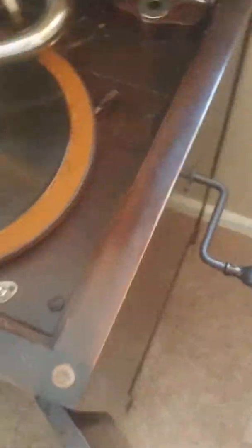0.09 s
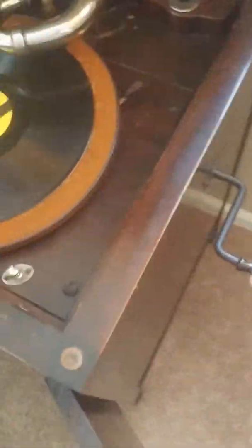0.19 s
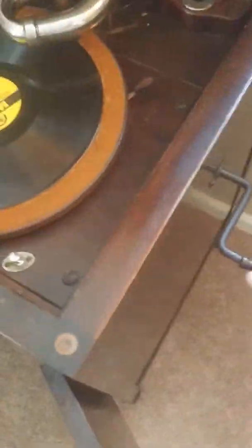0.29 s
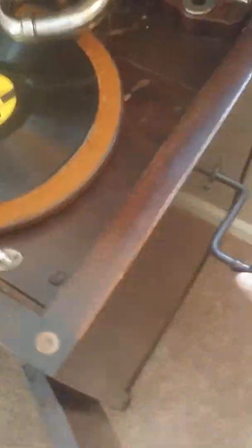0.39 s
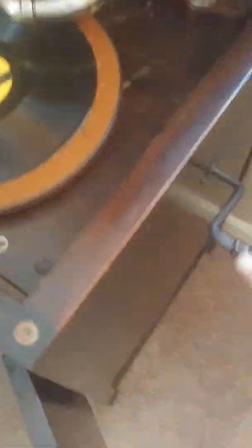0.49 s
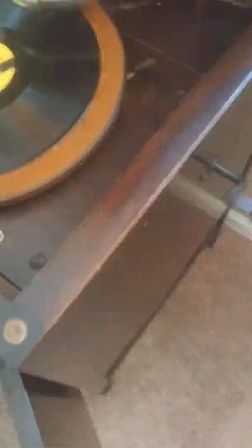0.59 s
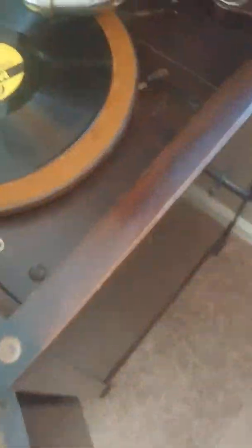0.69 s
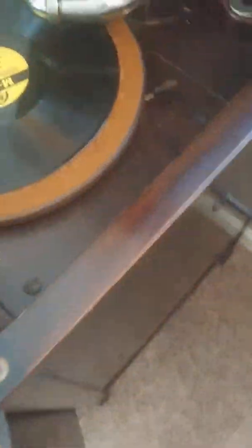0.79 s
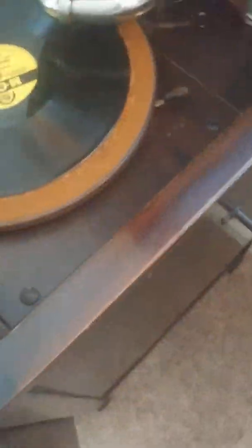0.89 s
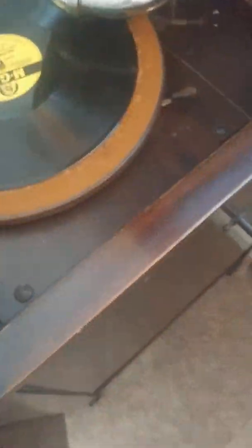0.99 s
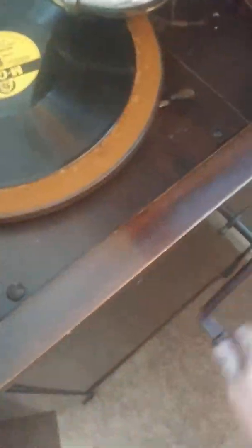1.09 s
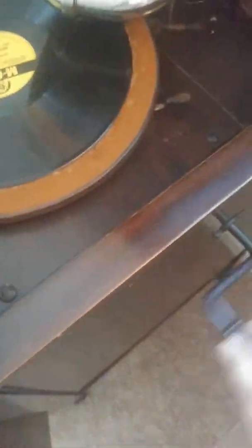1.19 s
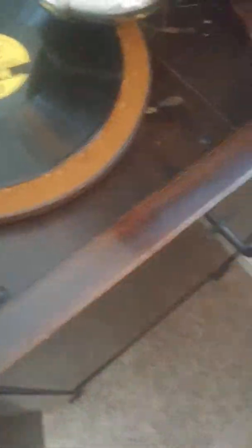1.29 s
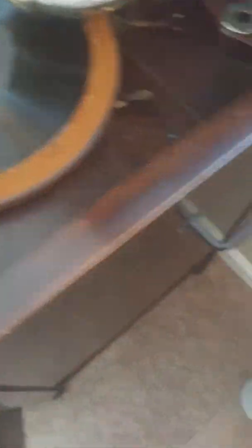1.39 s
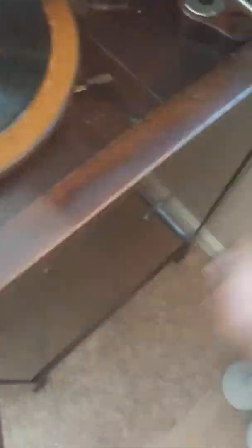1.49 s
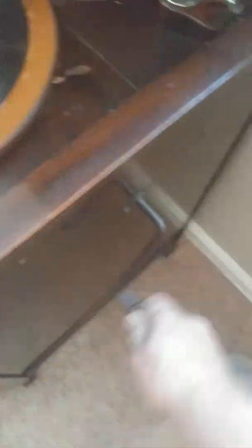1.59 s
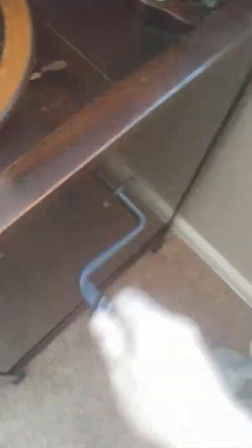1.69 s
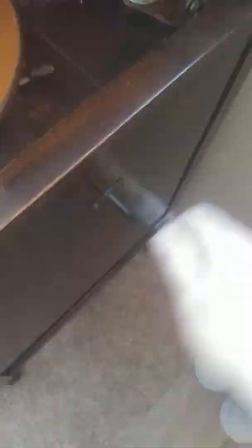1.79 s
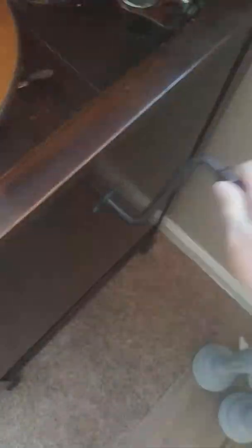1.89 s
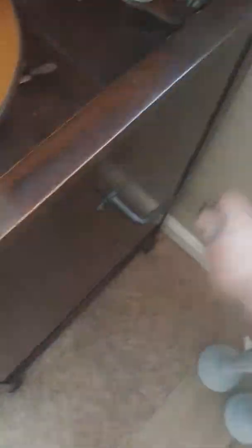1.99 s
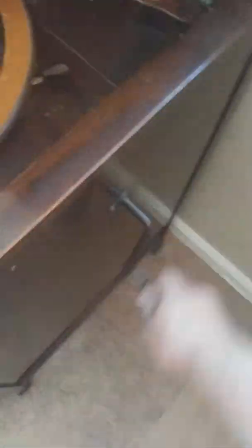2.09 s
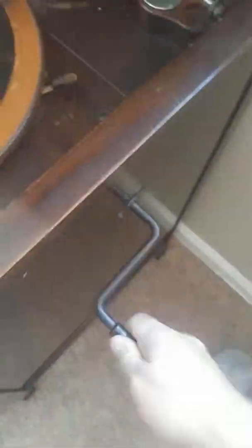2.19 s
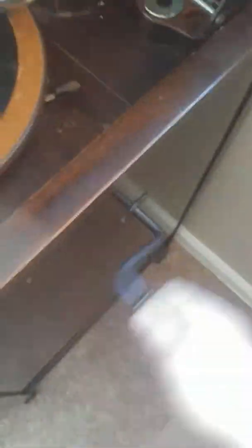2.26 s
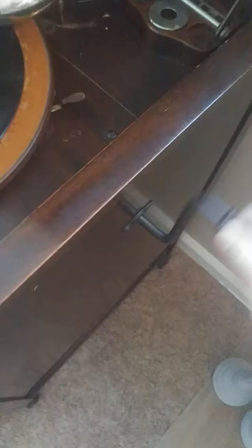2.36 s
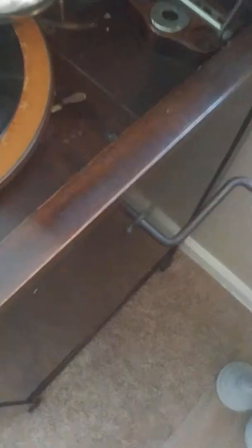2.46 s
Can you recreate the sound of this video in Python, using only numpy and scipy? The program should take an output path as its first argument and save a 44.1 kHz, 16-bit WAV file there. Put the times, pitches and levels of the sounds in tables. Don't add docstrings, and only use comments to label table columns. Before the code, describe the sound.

Hand crank winding a spring motor in a wooden cabinet, gears grinding after sharp metallic knocks

```python
import sys
import numpy as np
from scipy import signal
from scipy.fft import rfft, irfft, next_fast_len
from scipy.io import wavfile
from scipy.ndimage import uniform_filter1d

SR = 44100
rng = np.random.default_rng(int(sys.argv[2]) if len(sys.argv) > 2 else 0)


def wrap_up_sound(samples):
    columns = np.atleast_2d(samples).T
    tamed = np.clip(columns, -1, 1)
    steps = np.round(tamed * 32767).astype(np.int16)
    wavfile.write(sys.argv[1], SR, steps)


def field_ratio(decibels):
    return 10 ** (np.asarray(decibels, dtype=float) / 20)


N = 110250


def evened(x):
    return x / np.sqrt(np.mean(x ** 2) + 1e-20)


def peak_of(x, db):
    return field_ratio(db) * x / np.abs(x).max()


def read(points, hz):
    f, value = np.transpose(points)
    return np.interp(np.log(hz + 1), np.log(f + 1), value)


def curve(table):
    start_s, level_db = np.transpose(table)
    return np.interp(np.arange(N) / SR, start_s, level_db)


def add(mix, s, sound):
    part = mix[..., max(round(s * SR), 0):][..., :sound.shape[-1]]
    part += sound[..., :part.shape[-1]]


def filtered(x, order, hz, kind="low"):
    return signal.sosfilt(signal.butter(order, hz, kind, fs=SR, output="sos"), x)


def resonate(x, hz, width):
    r = np.exp(-np.pi * width / SR)
    turn = np.exp(2j * np.pi * hz / SR)
    return 2 * signal.lfilter([1 - r], [1, -r * turn], x).real


def strike(drive, body):
    return signal.oaconvolve(drive[None], body, axes=1)


def turns_of(count, per_s):
    return np.cos(np.pi * (per_s * np.arange(N) / SR + np.arange(count)[:, None] / count))


# pitch_hz, level_db (per Hz)
AIR = [(30, -5.5), (60, 2.5), (120, -2), (200, -31.5), (500, -10.5), (1500, -26), (5000, -32), (16000, -26)]
# pitch_hz, likeness (1 = same at both ports)
AIR_SAME = [(60, 1), (200, 0.99), (500, 0.53), (1500, 0.038), (8000, 0.065)]
AIR_DB = -58
WHINE_HZ, WHINE_WIDTH_HZ, WHINE_DB = 12500, 100, -76
HISS_PATCH_DB, HISS_SWELL_DB, WHINE_WAVER_DB = 1.5, 1.5, 4


def air():
    frames, hz = N // 256 + 5, np.fft.rfftfreq(1024, 1 / SR)
    a, b, c, d, patches = rng.standard_normal((frames, 513, 5)).T
    patches = uniform_filter1d(uniform_filter1d(patches, size=12, axis=0), size=14, axis=1)
    swell = evened(uniform_filter1d(rng.standard_normal(frames), size=20))
    level_db = read(AIR, hz)[:, None] + HISS_PATCH_DB * evened(patches) + HISS_SWELL_DB * swell
    same = np.clip(read(AIR_SAME, hz), -1, 1)[:, None]
    left = a + 1j * b
    right = same * left + np.sqrt(1 - same ** 2) * (c + 1j * d)
    hiss = signal.istft(np.array([left, right]) * field_ratio(level_db), nperseg=1024, noverlap=768)[1][:, :N]

    whine = evened(resonate(rng.standard_normal(N), WHINE_HZ, WHINE_WIDTH_HZ))
    waver = evened(uniform_filter1d(rng.standard_normal(N), size=3000))
    whine_db = np.array([[WHINE_DB], [WHINE_DB - 19]]) + WHINE_WAVER_DB * waver
    return field_ratio(AIR_DB) * evened(hiss) + whine * field_ratio(whine_db)


# start_s, level_db
ROCK = [(0, -54), (.27, -51), (.3, -39), (.46, -61.5), (1.11, -46), (1.16, -42.5), (1.22, -49), (1.28, -39),
        (1.38, -48), (1.48, -46), (1.63, -68), (1.72, -41), (1.76, -44.5), (1.84, -34.5), (2.08, -64),
        (2.24, -38.5), (2.33, -42), (2.5, -47.5)]
ROCK_HZ, ROCK_WIDTH_HZ = 72, 6


def rocking():
    hum = resonate(resonate(rng.standard_normal(N), ROCK_HZ, ROCK_WIDTH_HZ), ROCK_HZ, 22)
    steady = hum / np.sqrt(uniform_filter1d(hum ** 2, size=2400) + 0.36 * np.mean(hum ** 2))
    return field_ratio(curve(ROCK) - 4.5) * steady


# start_s, level_db (peak), pitch_hz (centre), t60_s
TICKS = [(0.009, -38, 6600, 0.03), (0.0094, -29.5, 2840, 0.06), (0.188, -49, 2420, 0.34),
         (0.2043, -24.5, 3070, 0.07), (0.2054, -26.5, 10400, 0.034), (0.2513, -34, 6370, 0.033),
         (0.2682, -29.5, 8060, 0.14), (0.2732, -12, 10770, 0.086), (0.2884, -38, 11000, 0.068),
         (0.576, -55, 6900, 0.041), (0.589, -41.5, 10500, 0.02), (0.6085, -50, 10200, 0.023),
         (0.709, -57, 3260, 0.19), (0.9057, -57, 3230, 0.074), (0.9632, -39, 2960, 0.037),
         (0.9728, -39.5, 2450, .09), (1.1309, -74, 2360, .04), (1.235, -66, 2430, .04),
         (1.242, -49.5, 3100, 0.043), (1.2885, -57, 2400, 0.044), (1.3754, -52.5, 2640, 0.037),
         (1.413, -53, 2900, 0.093), (1.445, -52.5, 2590, 0.21), (1.484, -56, 2570, .05),
         (1.502, -51, 2300, 0.14), (1.5485, -35, 2240, 0.079), (1.8701, -41.5, 10600, 0.014),
         (1.889, -52, 10500, 0.067), (2.0412, -49.5, 2860, 0.22), (2.073, -52, 2470, 0.13),
         (2.0846, -43, 2960, 0.12), (2.262, -65, 2190, .04), (2.2934, -46, 4300, 0.018),
         (2.3242, -52, 2080, 0.087), (2.375, -52, 4230, 0.027), (2.4944, -45.5, 3750, 0.022)]
TICK_DB, TICK_FLAT_DB = -11, -6.5
TICK_WIDE, TICK_WIDEST_HZ, TICK_REACH = 0.58, 2600, 3
TICK_SNAP_DB, TICK_SNAP_S = -7, 0.016


def ticks():
    out, t = np.zeros(N), np.arange(6000) / SR
    for (s, db, hz, t60), (chance, lumps) in zip(TICKS, rng.standard_normal((len(TICKS), 2, 6000))):
        grains = chance * field_ratio(2.15 * evened(uniform_filter1d(lumps, size=70)))
        width = min(TICK_WIDE * hz, TICK_WIDEST_HZ)
        tone = evened(resonate(resonate(grains, hz, width), hz, 2 * width))
        flat = evened(filtered(grains, 2, min(TICK_REACH * hz, SR / 2.2)))
        burst = evened(filtered(tone + field_ratio(TICK_FLAT_DB) * flat, 2, 900, "high"))
        dying = field_ratio(db + TICK_DB - 60 * t / max(t60, .005))
        onset = np.minimum(t / 0.0009, 1)
        snap = 1 + field_ratio(TICK_SNAP_DB) * np.exp(-t / TICK_SNAP_S)
        add(out, s - .001, dying * onset * snap * burst)
    return out


UNLIKE, UNLIKE_DB, DETUNE = .9, 2.5, .025


def ring(modes):
    t, out = np.arange(SR // 4) / SR, 0
    spots = np.pi / 2 * np.sin(rng.uniform(0, 2 * np.pi, (len(modes), 3)))
    for (hz, db, t60), (a, b, c) in zip(modes, spots):
        skew = np.array([[1], [-1]]) * UNLIKE * min(hz / 500, 1) ** 2
        level = field_ratio(db + UNLIKE_DB * a * skew - 60 * t / t60)
        out = out + level * np.sin(2 * np.pi * hz * (1 + DETUNE * c) * t + skew * b / 2)
    return out / np.linalg.norm(out)


# pitch_hz, level_db, t60_s
PANELS = [(102.5, -3, 0.05), (160.6, -1, 0.073), (292.6, -5.5, 0.4), (343.5, -6, 0.31), (409, -13.5, 0.077),
          (473.8, -2.5, 0.13), (512, 2, 0.15), (576, 1.5, 0.06), (606.5, -5, 0.099), (676.6, -6, 0.071),
          (739, 0, 0.027), (855, 19, 0.019), (946, 8, 0.022), (1120, -20.5, 0.14)]


def panels():
    return ring(PANELS)


# pitch_hz, level_db
FRAME = [(1090, 9.5), (1227, 16), (1357, 2.5), (1437, 4.5), (1550, 3), (1650, -3), (1728, 0.5), (1850, -34),
         (1985, -1), (2300, -12.5), (2600, -7)]
FRAME_T60_S = .03


def frame():
    return ring([(hz, db, FRAME_T60_S) for hz, db in FRAME])


# start_s, level_db (peak), pitch_hz (main), hardness_db, push_db (low thump)
KNOCKS = [(0.011, -31, 525, -28, -16), (0.093, -52, 285, -27, -8), (0.133, -37, 540, -50, -23),
          (0.206, -17.5, 880, -27, -5.5), (0.211, -19, 527, -47, -5), (0.215, -26, 297, -45, -24),
          (0.254, -21.5, 630, -27, -21), (0.2755, -9.5, 1023, -19, -23.5), (0.282, -15, 501, -22, -26),
          (0.286, -22, 327, -26, -17), (0.296, -16, 536, -55, -16), (0.311, -24.5, 605, -50, -28),
          (0.333, -29, 523, -57, -7), (0.372, -31, 572, -20, -9), (0.608, -45, 880, -32, -5),
          (0.713, -36, 492, -57, -18), (0.796, -38, 496, -55, 0), (0.915, -40.5, 497, -40, 0),
          (0.974, -22, 557, -28, -16), (1.131, -29.5, 904, -31.5, -19), (1.136, -36.5, 284, -47, -19),
          (1.149, -32, 340, -39, -5), (1.249, -37, 573, -22, -25), (1.375, -35.5, 458, -45, -1),
          (1.423, -33.5, 510, -45, -11), (1.447, -30, 482, -23, -20), (1.467, -39, 610, -43, -4.5),
          (1.552, -23.5, 495, -24, -29), (1.673, -25.5, 753, -21, -8.5), (1.681, -23.5, 293, -28, -15),
          (1.69, -27.5, 452, -48, 3), (1.8, -30, 500, -38, -0.5), (1.953, -34, 493, -29, -5),
          (2.092, -27.5, 485, -24.5, -18), (2.099, -29, 362, -37, -27), (2.208, -25, 718, -18, -34),
          (2.213, -32.5, 302, -34, -4), (2.221, -26.5, 356, -40, -0.5), (2.462, -36.5, 262, -40, -10),
          (2.494, -24.5, 820, -40, -14)]
KNOCK_DB, HARD_DB, SPOT_DB, SPOT_T60_S = -2, 14.5, 2.5, .028
BLOW_S, BLOW_RATTLE, BLOW_CUT_HZ, CRACK_S = 0.0018, 1, 230, 0.0028
PUSH_DB, PUSH_HZ, PUSH_S = -11.5, 128.4, 0.0048


def knocks():
    out, t = np.zeros((2, N)), np.arange(2000) / SR
    chances = rng.standard_normal((len(KNOCKS), 2000))
    for (s, db, hz, hard_db, push_db), chance in zip(KNOCKS, chances):
        rattle = evened(resonate(resonate(chance, 930, 870), 930, 710))
        shake = np.sin(2 * np.pi * hz * t) + BLOW_RATTLE * rattle
        blow = filtered(shake * t * np.exp(-t / BLOW_S), 3, BLOW_CUT_HZ, "high")
        crack = resonate(resonate(chance, 1400, 1000), 1500, 1400) * t * np.exp(-t / CRACK_S)
        push = t * np.exp(-t / PUSH_S) * np.sin(2 * np.pi * PUSH_HZ * t)
        body = panels() + field_ratio(SPOT_DB) * ring([(hz, 0, SPOT_T60_S)])
        add(out, s - .002, peak_of(strike(blow, body), db + KNOCK_DB))
        add(out, s - .002, peak_of(strike(crack, frame()), db + hard_db + HARD_DB))
        add(out, s, peak_of(push, db + push_db + PUSH_DB))
    return out


# start_s, level_db
EFFORT = [(0.04, -44.5), (.1, -58), (.62, -60.5), (.73, -51.5), (.86, -45.5), (.9, -45), (1.11, -51),
          (1.16, -47), (1.36, -44.5), (1.44, -40.5), (1.63, -50.5), (1.71, -45), (1.84, -45.5), (1.91, -52),
          (1.96, -42), (2.18, -47.5), (2.26, -39), (2.5, -52.5)]
TEETH_PER_S, TOOTH_JITTER, TOOTH_SPREAD_DB, GRIND = 45, .12, 3, .6
GEAR_DB, GEAR_EDGE_HZ, GEAR_FRAME_DB = 2.5, 1030, -22.5
EFFORT_BRIGHT, USUAL_DB = .5, -41
SCRAPE_DB, SCRAPE_HZ, SCRAPE_FOLLOW = -67.5, 2000, 1


def gears():
    jitter = evened(uniform_filter1d(rng.standard_normal(N), size=500))
    teeth = np.cumsum(TEETH_PER_S * (1 + TOOTH_JITTER * jitter)) / SR
    tooth_sizes = field_ratio(TOOTH_SPREAD_DB * np.sin(rng.uniform(0, 2 * np.pi, 400)))
    size = tooth_sizes[np.clip(teeth, 0, 399).astype(int)]
    drive = evened((size * np.exp(-(teeth % 1) / 0.21) + GRIND) * rng.standard_normal(N))

    effort_db = curve(EFFORT)
    extra_db = effort_db - USUAL_DB
    dull = filtered(drive, 4, GEAR_EDGE_HZ)
    dull = dull + (field_ratio(EFFORT_BRIGHT * extra_db) - 1) * filtered(dull, 2, 680, "high")
    wood = evened(sum(strike(w * dull, panels())[:, :N] for w in turns_of(count=4, per_s=2.272)))
    wood = wood + field_ratio(GEAR_FRAME_DB) * evened(strike(drive, frame())[:, :N])
    wood = wood / evened(uniform_filter1d(wood ** 2, size=3000).mean(0) ** 0.13)

    scrape = evened(resonate(drive, SCRAPE_HZ, 2140) - resonate(drive, 350, 2200))
    return field_ratio(GEAR_DB + effort_db) * evened(wood), field_ratio(SCRAPE_DB + SCRAPE_FOLLOW * extra_db) * scrape


SCATTER_S, SCATTER_SHARE = .003, .6


def scattered(x):
    taps = rng.standard_normal((2, 400)) * np.exp(-np.arange(400) / SR / SCATTER_S)
    return strike(x, taps / np.linalg.norm(taps, axis=1, keepdims=True))[:, :N]


# pitch_hz, t60_s
ROOM = [(100, 0.19), (500, 0.28), (1000, 0.16), (2000, 0.29), (6000, 0.49), (12000, 0.28)]
ROOM_DB, ROOM_BRIGHT_DB = -6.5, -13.5


def room(x):
    taps = np.zeros((2, SR // 2))
    at = np.arange(200, SR // 2 - 20, 20)
    at = at + rng.integers(0, 20, (2, len(at)))
    np.put_along_axis(taps, at, rng.choice([-1., 1.], at.shape), 1)
    hz, t, z = signal.stft(taps, SR, nperseg=256)
    apart = np.clip(hz / 400, 0, 1)[:, None] ** 2
    z = np.array([z[0], z[0] + apart * (z[1] - z[0])])
    tail = signal.istft(z * field_ratio(-60 * t / read(ROOM, hz)[:, None]), SR, nperseg=256)[1]
    return signal.fftconvolve(x[None], tail / np.linalg.norm(tail[0]), axes=1)[:, :N]


def scene():
    grind, scrape = gears()
    wood, metal = grind + knocks(), ticks() + scrape
    near = metal + SCATTER_SHARE * sum(scattered(w * metal) for w in turns_of(count=3, per_s=43))
    send = field_ratio(ROOM_DB) * wood.mean(0) + field_ratio(ROOM_BRIGHT_DB) * metal
    far = sum(room(w * send) for w in turns_of(count=3, per_s=1.72))
    return air() + rocking() + wood + near + far


# pitch_hz, level_db
MIC = [(4000, 7), (6900, 9), (8100, 3.5), (8900, -4.5), (10300, 2.5), (12000, -1), (15700, -1.5),
       (16400, -38)]
# pitch_hz, level_db (left minus right)
PORTS = [(120, -0.5), (300, -0.5), (550, -4), (1100, 0.5), (2200, 0), (7000, -7.5), (9200, 3.5),
         (10300, 14.5), (11800, 3.5)]
LEFT_LAG_S = -0.0004133


def ports(x):
    size = next_fast_len(N + 2000)
    hz = np.fft.rfftfreq(size, 1 / SR)
    half_db = read(PORTS, hz) / 2
    left = field_ratio(half_db) * np.exp(-2j * np.pi * hz * LEFT_LAG_S)
    right = field_ratio(-half_db) + 0j
    return irfft(rfft(x, size) * field_ratio(read(MIC, hz)) * np.array([left, right]), size)[:, :N]


def roll_off(x):
    return signal.sosfilt(signal.butter(12, 16600, fs=SR, output="sos"), x)


def record(dry):
    ceiling = .95
    cut = filtered(ports(dry), 5, 48, "high")
    return roll_off(ceiling * np.tanh(cut / ceiling))


dry = scene()
out = record(dry)
wrap_up_sound(out)
```